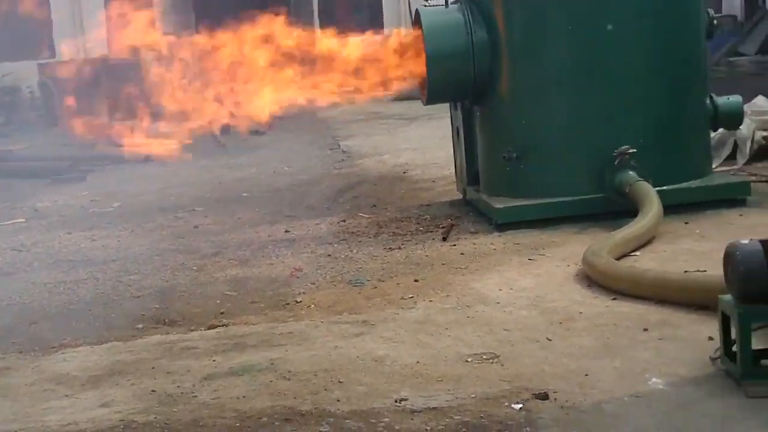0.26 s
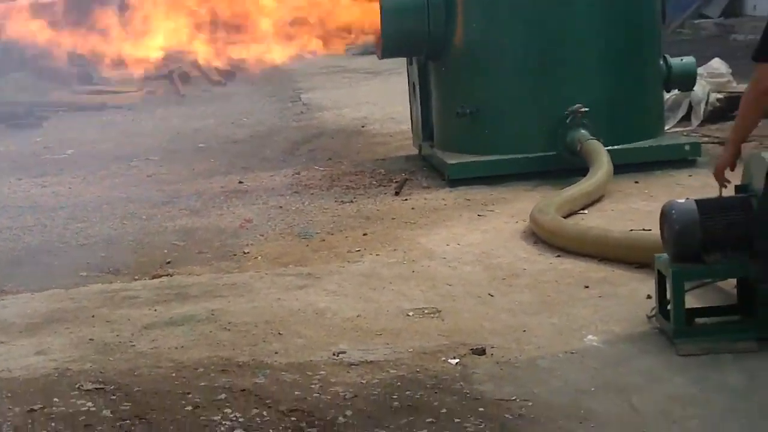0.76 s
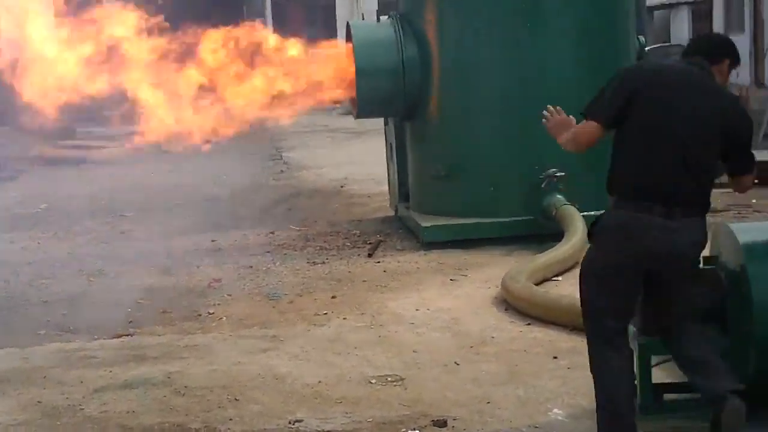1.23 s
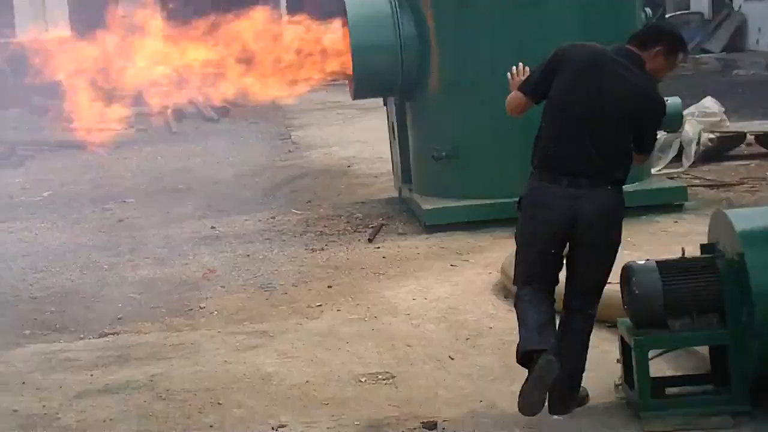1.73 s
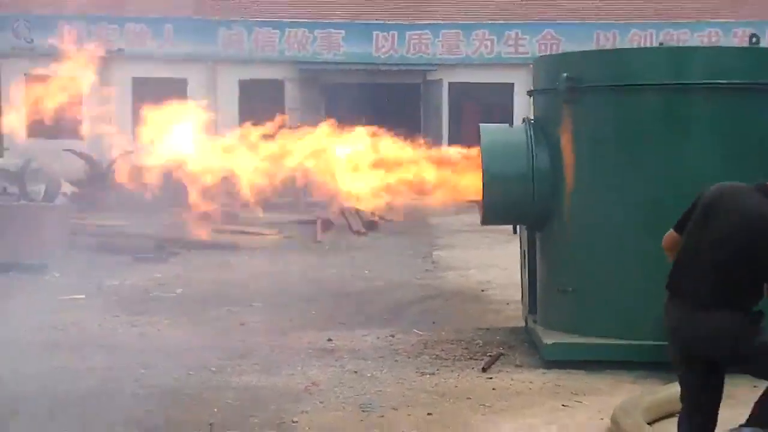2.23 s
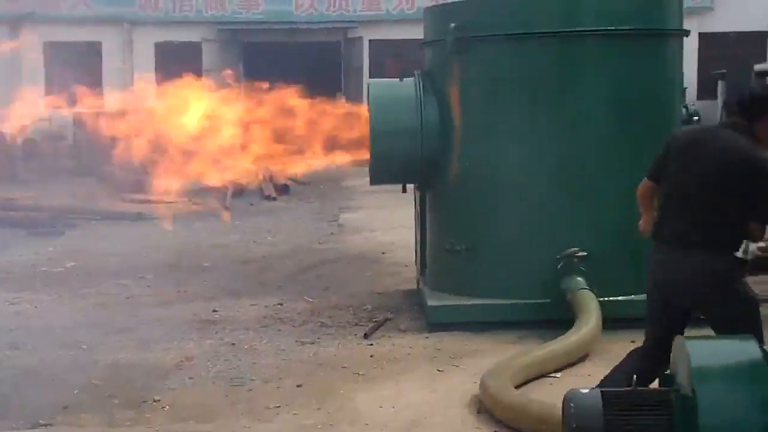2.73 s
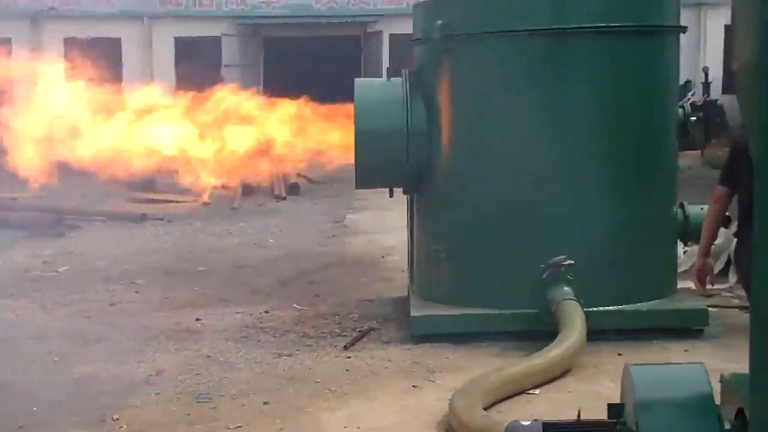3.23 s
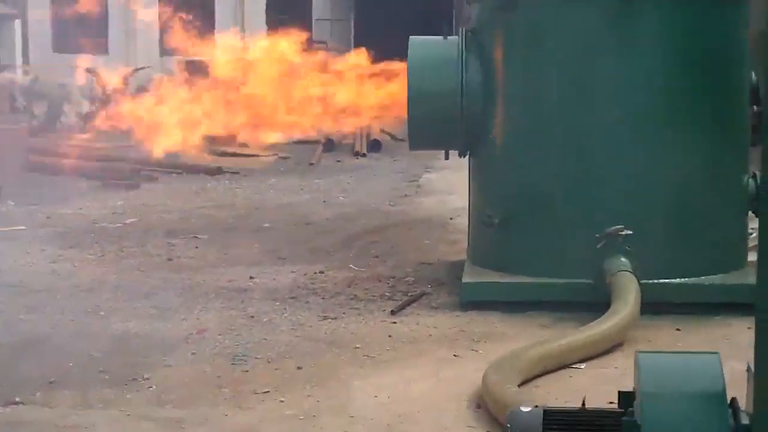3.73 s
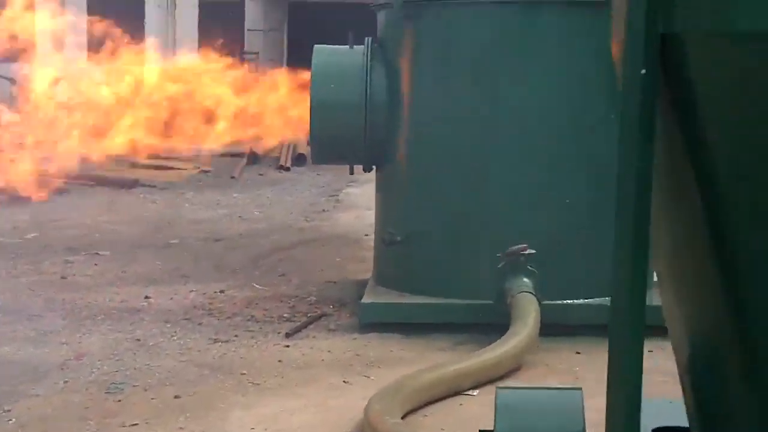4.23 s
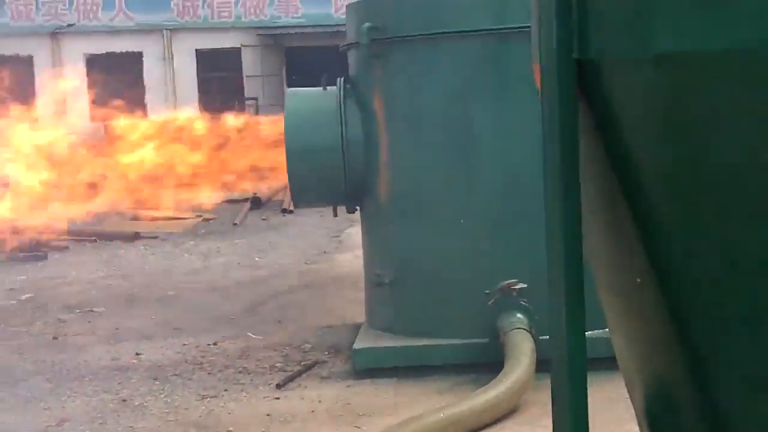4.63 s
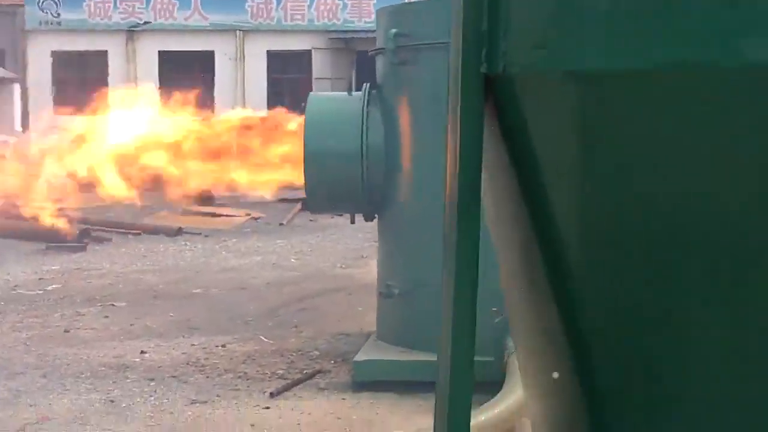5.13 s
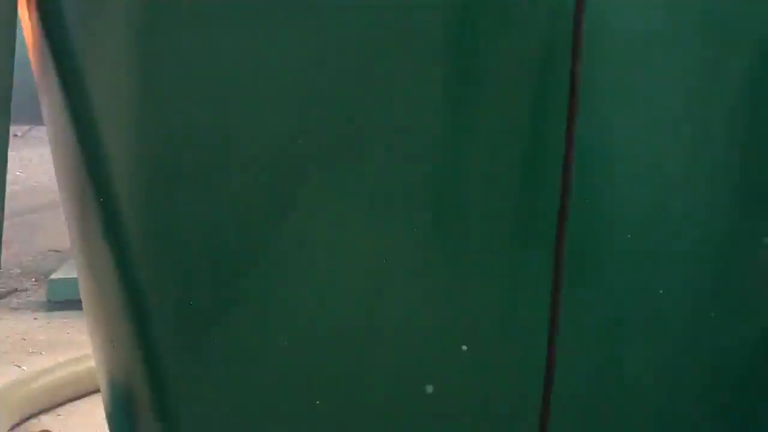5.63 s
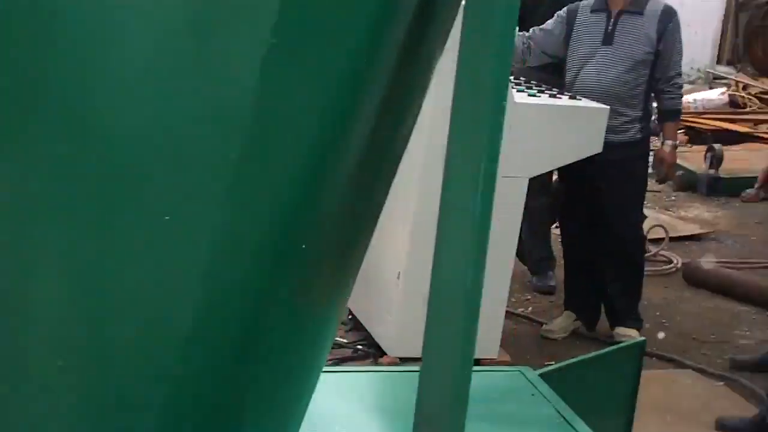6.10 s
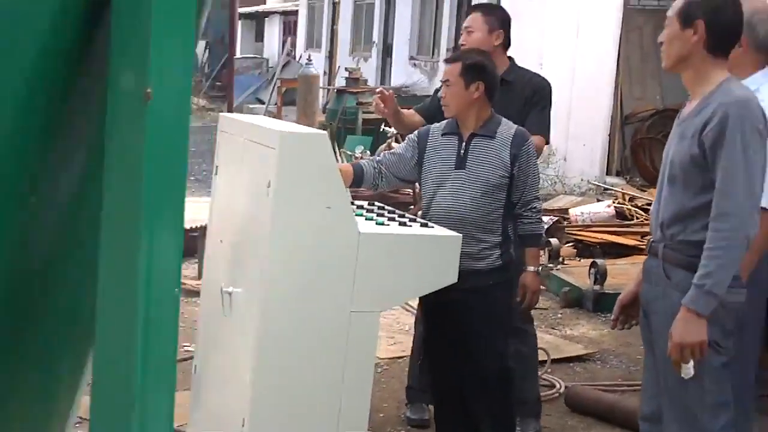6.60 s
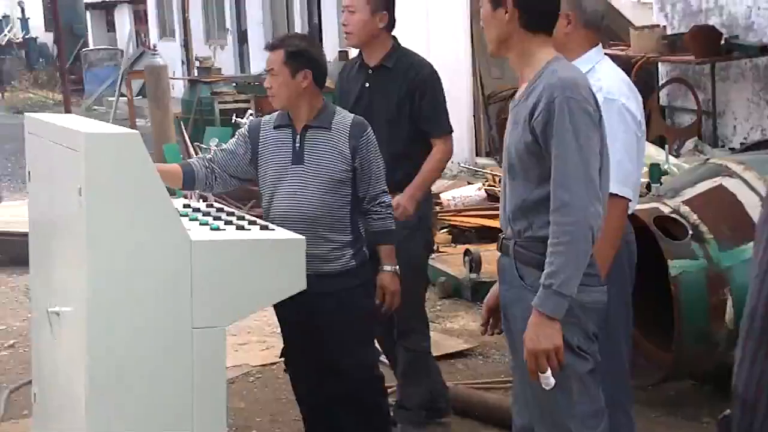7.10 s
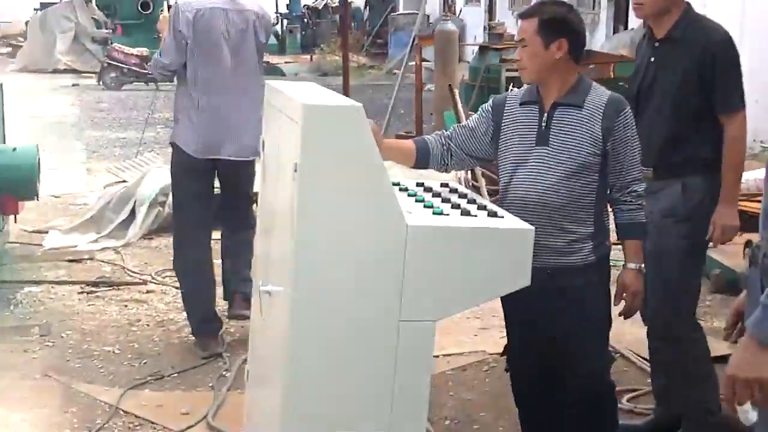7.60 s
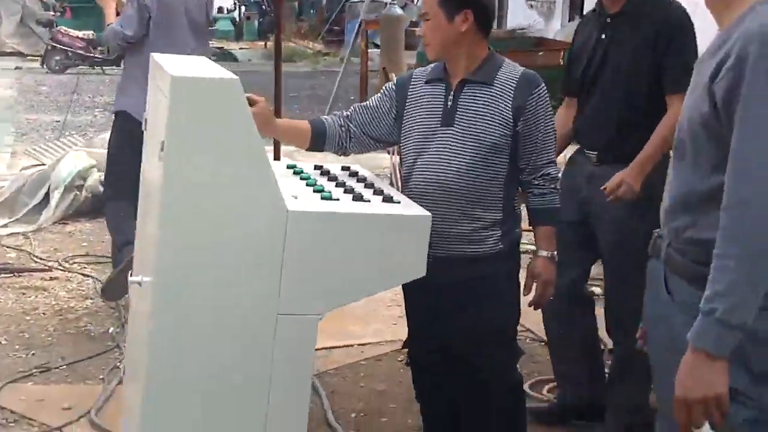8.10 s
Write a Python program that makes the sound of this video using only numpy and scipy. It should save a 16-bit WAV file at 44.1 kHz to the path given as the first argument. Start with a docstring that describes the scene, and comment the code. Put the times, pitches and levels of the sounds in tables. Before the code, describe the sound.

In an open factory yard, a big burner jet gives a continuous low, fluttering roar with faint air rush. Fuel lumps crack and clatter on steel plate, densest around two, three and a half, and six seconds. A blower tone flickers, then hums strongly as the mono microphone passes the hopper; the sound is dull on top, without deep treble sparkle.

```python
"""A large burner in a factory yard, in mono. The take opens on the flame's lumpy roar, under a faint hum
that creeps up in pitch and fades within the first second; fuel lumps soon clatter on the steel.
The microphone turns from the flame, passes behind the hopper and ends close to the blower, whose
blade tone flickers at first and is strongest from about 6 to 7.5 s. Air and fire are shaped noise,
blower and motor are unsteady sines, each lump is a burst of noise with ringing plate modes."""
import sys
import numpy as np
from scipy import signal
from scipy.fft import rfft, irfft
from scipy.io import wavfile
from scipy.ndimage import uniform_filter1d

SR = 44100
rng = np.random.default_rng(int(sys.argv[2]) if len(sys.argv) > 2 else 0)


def boost_factor(decibels):
    """Convert a level in decibels to a linear amplitude factor."""
    exponent = np.asarray(decibels, float) / 20
    return 10 ** exponent


def int16_out(signal):
    """Quantize to a 16-bit WAV file."""
    q = np.round(np.clip(np.atleast_2d(signal).T, -1, 1) * 32767)
    wavfile.write(sys.argv[1], SR, q.astype(np.int16))


N = 368235  # samples

# flame and air jet as the microphone turns: start_s, rumble_db, roar_db, nozzle_db, rush_db
FLAME_LEVELS = [(0, -18.5, -22.5, -36, -37), (.35, -21, -26.5, -35, -37.5), (.55, -22, -21, -34.5, -35),
                (.95, -20, -23, -34.5, -40.5), (1.3, -18, -21, -33, -39), (1.9, -19.5, -21, -33, -35.5),
                (2.3, -20.5, -21.5, -30, -37.5), (2.55, -18.5, -22, -34, -34.5),
                (2.75, -20.5, -17.5, -32, -39), (2.95, -20.5, -22, -30.5, -37.5),
                (3.3, -18.5, -20.5, -32.5, -36.5), (3.7, -19, -22, -31.5, -38),
                (4.1, -19, -20.5, -29.5, -41), (4.7, -20, -20.5, -31, -35.5),
                (5.15, -16.5, -24.5, -29.5, -35.5), (5.7, -20, -23.5, -32, -30),
                (6.4, -18, -22, -34.5, -31.5), (6.9, -19.5, -25, -38, -32.5),
                (7.55, -18, -24.5, -36.5, -36), (7.85, -18, -27, -35, -33), (8.35, -18.5, -20.5, -38, -33)]
# slow combustion rumble, spectrum: frequency_hz, density_db (per Hz, relative)
RUMBLE_SPECTRUM = [(12, -11.5), (20, -11), (32, 5), (55, 3), (80, -4.5), (110, -5), (200, -30.5),
                   (400, -87)]
# tearing roar, spectrum without its hump: frequency_hz, density_db (per Hz, relative)
ROAR_SPECTRUM = [(60, -38.5), (90, -3), (125, -4), (165, -2), (210, -6), (270, -9.5), (340, -21.5),
                 (600, -65.5)]
# hump in the roar that drifts as the flame stretches: start_s, centre_hz, height_db
ROAR_HUMP = [(0, 140.2, 3.5), (.5, 136.2, 9), (1.1, 127, 8), (1.6, 132, 7.5), (1.9, 162, 1.5),
             (2.2, 163, 7), (2.75, 169, 2.5), (3.4, 168.4, 5), (3.7, 149, 1.5), (4, 148, 4.5),
             (4.35, 120.8, 4), (4.8, 140, -2.5), (5.2, 160, 5), (5.7, 163, -0.5), (8.35, 166.4, 0.5)]
# nozzle noise, spectrum: frequency_hz, density_db (per Hz, relative)
NOZZLE_SPECTRUM = [(350, -23), (480, -8.5), (620, 4.5), (760, 3.5), (950, -1.5), (1100, -7), (1500, -10),
                   (2500, -47.5)]
# blower casing noise, spectrum: frequency_hz, density_db (per Hz, relative)
CASING_SPECTRUM = [(220, -24.5), (290, 3), (330, -0.5), (420, -2), (520, -5), (620, -10.5), (1000, -55)]
# air rush before its tilt, spectrum: frequency_hz, density_db (per Hz, relative)
RUSH_SPECTRUM = [(850, -8.5), (1450, -2.5), (1620, -2.5), (1980, -2.5), (2300, -6), (2520, -4),
                 (4370, -10.5), (4900, -11.5), (6730, -22.5), (7300, -49), (9490, -71), (16100, -120)]
# treble tilt of the rush as the microphone turns: start_s, tilt_db_per_octave (well above 2500 Hz)
RUSH_TILT = [(0, 0.5), (.9, -0.5), (1.3, 2), (2.2, -1.5), (3.2, 0.5), (3.8, 4), (4.4, 3), (5.2, -1),
             (5.7, -0.5), (6, -3.5), (6.6, -4.5), (7.4, -3.5), (8.35, -2)]
# how far the hopper hides the jet: start_s, hidden_share (0-1)
HOPPER_SCREEN = [(0, 0), (3, 0.05), (4.5, 0.16), (5.8, 1), (6.6, 1), (7.5, 1), (8.35, 0.5)]
# fuel lumps landing on steel: start_s, level_db (about the peak), low_band_hz, high_band_hz,
# ring_share (0-1)
FUEL_LUMPS = [(0.1365, -18, 1180, 2580, 0.05), (0.3124, -19.5, 1850, 2630, 0.34),
              (0.393, -23, 1840, 3240, 0.2), (0.4815, -18.5, 1190, 2590, 0.34),
              (0.6425, -23, 1210, 2600, 0.8), (0.7105, -19, 1740, 2600, 0.4), (1.099, -25.5, 1380, 2700, 0),
              (1.1788, -19, 1150, 3200, 0.08), (1.2531, -24.5, 1190, 2880, 0),
              (1.3627, -22, 845, 2360, 0.3), (1.4729, -25, 1700, 2900, 0.2), (1.5086, -17, 2640, 3280, 0.2),
              (1.5927, -16, 1750, 2660, 0.17), (1.668, -22, 912, 3800, 0.8), (1.769, -25, 835, 2900, 0.08),
              (1.838, -14.5, 1750, 3100, 0.1), (1.863, -20.5, 1850, 1900, 0.3),
              (1.945, -19.5, 2600, 3280, 0.2), (1.954, -23, 2600, 3280, 0.5),
              (1.9867, -11.5, 2600, 2600, 0.8), (1.9955, -9, 2600, 3280, 0.85),
              (1.996, -18.5, 1430, 1950, 0.4), (2.014, -24.5, 1400, 1950, 0), (2.055, -25, 1400, 2760, 0),
              (2.4577, -16.5, 1730, 2940, 0.06), (2.5315, -20.5, 1500, 2960, 0.37),
              (2.6238, -17, 900, 2820, 0), (2.6962, -17.5, 939, 2950, 0.27), (3.092, -11, 850, 4900, 0.2),
              (3.3163, -5, 2400, 3180, 0.2), (3.3353, -19, 1750, 2400, 0), (3.354, -17.5, 2400, 2760, 0.3),
              (3.4018, -17, 1850, 3020, 0.22), (3.4056, -5, 2420, 3600, 0.07),
              (3.4115, -10, 940, 4900, 0.3), (3.4225, -14, 940, 3100, 0.2), (3.442, -16, 1040, 3420, 0.6),
              (3.466, -22, 2760, 3420, 0.6), (3.529, -14, 1300, 3440, 0.25), (3.605, -15.5, 939, 3100, 0.4),
              (3.6341, -12, 2920, 3970, 0.4), (3.651, -22, 3000, 4900, 0.5), (3.775, -28, 1400, 3070, 0),
              (3.891, -21.5, 910, 3000, 0.07), (3.966, -22.5, 2300, 3050, 0), (4.03, -21, 851, 2760, 0),
              (4.151, -20, 1400, 4430, 0.6), (4.276, -30, 1400, 3500, 0.6), (4.5753, -18.5, 990, 3280, 0.4),
              (4.606, -23.5, 3280, 4600, 0.9), (4.676, -15, 2450, 2510, 0.7), (4.708, -19, 2300, 2450, 0.3),
              (4.7981, -22.5, 1380, 3520, 0), (4.858, -13.5, 2760, 3600, 0.2), (4.87, -17, 1650, 3280, 0.3),
              (4.888, -19, 1040, 3420, 0.8), (4.91, -24.5, 1650, 2580, 1), (5.066, -20.5, 1380, 3340, 0.6),
              (5.138, -12, 937, 3320, 0.15), (5.232, -12, 1850, 2760, 0.5), (5.243, -16, 1850, 2450, 0.4),
              (5.407, -24, 1400, 2530, 0.24), (5.5118, -8.5, 1040, 2620, 0.4),
              (5.518, -16.5, 1230, 1850, 0.4), (5.665, -8.5, 1040, 4600, 0.35),
              (5.674, -10.5, 1040, 1950, 0.8), (5.7, -18.5, 1750, 1750, 1), (5.7809, -15, 1240, 2050, 0.5),
              (5.814, -13, 1190, 1950, 0.4), (5.826, -21, 1950, 3280, 0.5), (5.997, -23, 1750, 1750, 0.6),
              (6.065, -22.5, 1750, 1750, 0.9), (6.114, -19.5, 2760, 3100, 0.3),
              (6.2627, -19.5, 1240, 2600, 0.4), (6.283, -23, 1210, 2600, 0.1),
              (6.3098, -23, 1850, 3800, 0.3), (6.33, -20, 1750, 2300, 0.4), (6.345, -15, 1260, 1850, 0.3),
              (6.369, -20.5, 1750, 3800, 0.4), (6.401, -14.5, 1046, 2760, 0.6),
              (6.413, -20.5, 1040, 3100, 0.2), (6.445, -23, 1750, 3410, 0.5),
              (6.491, -20.5, 1750, 3800, 0.3), (6.5476, -18, 2550, 4230, 0.6),
              (6.561, -24.5, 1850, 3420, 0.9), (6.772, -19.5, 851, 2500, 0.5),
              (6.864, -24.5, 1400, 3500, 0.8), (6.9178, -21, 1490, 2550, 0.1),
              (7.0702, -24.5, 1390, 3150, 0.07), (7.375, -25.5, 1750, 4600, 0.6),
              (7.522, -26, 2600, 4600, 0.2), (7.6616, -8.5, 900, 2580, 0.2),
              (7.671, -11.5, 1650, 1950, 0.25), (7.685, -16, 1950, 2600, 0.2),
              (7.7014, -19.5, 1850, 2580, 0.3), (7.721, -21.5, 1950, 2760, 0.1),
              (7.735, -22, 1950, 2300, 0.2), (7.746, -20.5, 1040, 2910, 0.3),
              (7.77, -26.5, 1990, 3100, 0.3), (7.788, -33, 2300, 3420, 0.2), (7.815, -23, 2300, 2870, 0),
              (7.875, -19, 2300, 4600, 0.4), (7.899, -23, 1650, 4600, 0.7), (8.1096, -19.5, 921, 2390, 0.1),
              (8.1284, -20.5, 847, 2200, 0.5), (8.141, -25, 1750, 1950, 0.75),
              (8.228, -24.5, 1650, 2760, 0.3), (8.283, -17.5, 1650, 2600, 0.3),
              (8.2909, -15.5, 1650, 3100, 0.3), (8.2981, -15.5, 1650, 3100, 0.25),
              (8.302, -13, 1040, 1650, 0.4), (8.315, -15, 1650, 2580, 0.3), (8.337, -18, 900, 2760, 0.3)]
# hopper plate modes without loose fuel: pitch_hz, level_db, t60_s
HOPPER_MODES = [(880, -12, 0.2), (912, 2, 0.28), (1040, 3.5, 0.081), (1157, -3, 0.13), (1215, -4, 0.47),
                (1260, -9, 0.6), (1400, -4.5, 0.16), (1736, -6, 0.88), (1750, -6.5, 0.73),
                (1850, 0.5, 0.23), (1650, -9, .12), (1950, -5.5, 0.13), (2300, -14, .12), (2450, -2, 0.1),
                (2510, -4, 0.06), (2600, -4.5, 0.082), (3100, -11, 0.16), (3280, -2.5, 0.087),
                (3600, -4, .08), (4900, -5.5, .08), (3420, -7.5, 0.1), (4230, -20, .1), (4390, -7, 0.16),
                (2760, -5, 0.036), (3800, -8, 0.064), (4600, -6, 0.066), (5100, -11.5, 0.059)]
# noisy crack of a lump, base spectrum: frequency_hz, density_db (per Hz, relative)
CRACK_SPECTRUM = [(500, -31.5), (850, -5), (1300, -5), (2130, -7.5), (2440, -6.5), (2740, -5), (4180, -7),
                  (4910, -5), (6920, -17), (7300, -36), (9490, -60.5), (16100, -120)]
# short dull blips: start_s, peak_db, pitch_hz (at the start, before the sag), length_s
DULL_KNOCKS = [(7.488, -23, 760, .032), (7.506, -30, 1170, 0.029)]
# blower blade tone, flickering at first, strongest and steadier from about 6 to 7.5 s: start_s, level_db
BLADE_LEVEL = [(0.0, -21), (0.02, -22), (1.12, -28.5), (1.16, -36), (1.21, -30.5), (1.28, -34), (1.32, -35),
               (1.67, -19), (2.04, -26), (2.23, -25.5), (2.35, -31.5), (2.6, -24), (2.79, -24), (2.93, -28),
               (3.35, -23), (3.63, -33), (3.65, -37.5), (4.02, -25), (4.3, -29), (4.4, -42), (4.58, -25.5),
               (4.79, -35.5), (4.93, -29.5), (4.95, -36.5), (5.18, -18.5), (5.35, -18.5), (5.65, -22),
               (6.12, -13.5), (7.46, -14), (7.84, -22.5), (8.3, -20.5), (8.35, -21)]
# octave of the blade tone, coming and going on its own: start_s, level_db
OCTAVE_LEVEL = [(0, -46.5), (.25, -39), (.4, -47), (.55, -36), (.9, -34.5), (1.05, -48), (1.3, -51),
                (1.43, -35), (1.58, -56), (1.75, -40), (1.92, -34.5), (2.1, -54), (3.7, -59), (3.85, -46),
                (4.1, -50), (4.4, -40), (4.6, -48), (4.9, -57), (5.08, -33), (5.3, -37), (5.42, -51),
                (5.68, -45), (5.85, -35.5), (6.0, -35.5), (6.2, -43), (6.4, -37), (6.6, -39), (6.9, -33.5),
                (7.35, -32), (7.6, -35.5), (7.72, -39), (7.79, -34), (7.86, -40), (8.1, -36), (8.35, -31)]
# motor whine: start_s, level_db
WHINE_LEVEL = [(0, -50), (.35, -45), (.58, -41.5), (.72, -50.5), (2.6, -46.5), (3.1, -54), (3.35, -40.5),
               (4.0, -47), (4.14, -35.5), (4.4, -41), (4.65, -41), (4.8, -35), (4.95, -31.5), (5.1, -36.5),
               (5.3, -35.5), (5.5, -39.5), (5.65, -32.5), (5.85, -39), (6.12, -50), (6.3, -38.5),
               (6.8, -43), (6.98, -46.5), (7.1, -35), (7.2, -39.5), (7.36, -42), (7.44, -60), (7.53, -42),
               (7.8, -47.5), (8.05, -43.5), (8.35, -53)]
# fainter whine just below it: start_s, level_db
UNDER_WHINE_LEVEL = [(0, -64.5), (3.6, -54), (4.1, -46), (5, -46.5), (5.4, -44), (5.8, -55), (7, -62),
                     (8.35, -55.5)]
# faint early hum: start_s, pitch_hz, level_db
FAINT_HUM = [(0, 380, -42), (.12, 380, -37), (.33, 381, -39), (.55, 386, -37), (.74, 391, -39),
             (.84, 393, -57)]

HUMP_OCTAVES = 0.17  # distance from the hump's centre to 1/e of its dB height
LUMPY_DB, LUMPS_HZ = 1.3, 9  # random flutter of the roar: rms depth, fastest rate
GUST_DB, GUST_HZ = 1.2, 25  # random gusts in the rush: rms depth, fastest rate
CASING_DB, CASING_NEAR_DB = -35.5, 5.5  # the rise comes as the jet is hidden and the blower nears
RISE_AT_0_DB_S, SLOWER_PER_DB = .0008, .75  # weak lumps tumble and start more softly
LUMP_T60_S, CHIP_T60_S = 0.25, 0.21
DAMP_T60_S = 0.24  # loose fuel on the plate shortens its ringing
CHIPS_DB, CHIPS_PER_S = -46.5, 40  # small chips that rattle all the time
BLADE_HZ, WHINE_HZ, UNDER_HZ = 296.75, 1387, 1267


def evened(x):
    """Scales to rms 1."""
    return x / np.sqrt(np.mean(x ** 2) + 1e-20)


def read(points, hz):
    """Reads a spectrum on a log-frequency axis."""
    f, value = np.transpose(points)
    return np.interp(np.log(hz + 1), np.log(f + 1), value)


def curve(rows, t):
    """Columns of a table at the times t."""
    s, *columns = np.transpose(rows)
    return [np.interp(t, s, c) for c in columns]


def wander(t, top_hz):
    """Slow random drift of rms 1, a sum of sines up to top_hz."""
    rates = np.geomspace(top_hz / 20, top_hz, num=24)
    return evened(sum(np.sin(2 * np.pi * (f * t + rng.random())) / np.sqrt(f) for f in rates))


def smoothed(x, width):
    """Two passes of a running mean over width samples."""
    return uniform_filter1d(uniform_filter1d(x, size=width), size=width)


def coloured(x, db_of_hz):
    """Weights the spectrum of noise by a dB curve."""
    hz = np.fft.rfftfreq(len(x), 1 / SR)
    return irfft(rfft(x) * boost_factor(db_of_hz(hz)), len(x))


def oscillator(hz):
    """Sine that follows a moving pitch."""
    return np.sin(2 * np.pi * np.cumsum(hz) / SR)


def turbulence(field_db, size, patchy_db):
    """Random short-time spectra under a dB field (bins x frames) with drifting patches."""
    real, imag, patches = rng.standard_normal((3,) + field_db.shape)
    patches = uniform_filter1d(patches, size=8, axis=0)
    patches = evened(uniform_filter1d(patches, size=6, axis=1))
    spectra = (real + 1j * imag) * boost_factor(field_db + patchy_db * patches)
    return signal.istft(spectra, nperseg=size, noverlap=size - size // 4)[1][:N]


def flame():
    """Slow combustion rumble, tearing roar, humps of nozzle and casing, the rush of air on top."""
    # long frames for the low layers
    hz = np.fft.rfftfreq(2048, 1 / SR)[:, None]
    steady = np.zeros(N // 512 + 5)
    hump_hz, hump_db = curve(ROAR_HUMP, np.arange(len(steady)) * 512 / SR)
    hump_db = hump_db * np.exp(-(np.log2((hz + 1) / hump_hz) / HUMP_OCTAVES) ** 2)
    rumble = turbulence(read(RUMBLE_SPECTRUM, hz) + steady, size=2048, patchy_db=0.0)
    roar = turbulence(read(ROAR_SPECTRUM, hz) + hump_db, size=2048, patchy_db=1.0)
    nozzle = turbulence(read(NOZZLE_SPECTRUM, hz) + steady, size=2048, patchy_db=0.77)
    casing = turbulence(read(CASING_SPECTRUM, hz) + steady, size=2048, patchy_db=0.7)

    # short frames for the quick rush
    t = np.arange(N // 128 + 5) * 128 / SR
    hz = np.fft.rfftfreq(512, 1 / SR)[:, None]
    tilt_db = np.log2(1 + hz / 2500) * curve(RUSH_TILT, t)[0]
    gusts_db = GUST_DB * wander(t, GUST_HZ)
    rush = turbulence(read(RUSH_SPECTRUM, hz) + tilt_db + gusts_db, size=512, patchy_db=2.0)

    now = np.arange(N) / SR
    rumble_db, roar_db, nozzle_db, rush_db = curve(FLAME_LEVELS, now)
    roar_db = roar_db + LUMPY_DB * np.interp(now, t, wander(t, LUMPS_HZ))
    casing_db = CASING_DB + CASING_NEAR_DB * curve(HOPPER_SCREEN, now)[0]
    layers = rumble, roar, nozzle, rush, casing
    levels_db = rumble_db, roar_db, nozzle_db, rush_db, casing_db
    return sum(evened(layer) * boost_factor(db) for layer, db in zip(layers, levels_db))


def fuel():
    """Lumps of fuel and dull knocks at their moments; small chips landing at random."""
    out = np.zeros(N + 16384)
    for s, db, low_hz, high_hz, ring in FUEL_LUMPS:
        # weak lumps start more softly than strong or ringing ones
        rise_s = RISE_AT_0_DB_S * boost_factor(-SLOWER_PER_DB * db * (2 - ring))
        out[round(s * SR):][:16384] += boost_factor(db) * clatter(low_hz, high_hz, LUMP_T60_S, ring, rise_s)
    for s, db, hz, length in DULL_KNOCKS:
        blip = boost_factor(db) * knock(hz, length)
        out[round(s * SR):][:len(blip)] += blip
    return out[:N] + boost_factor(CHIPS_DB) * evened(chips())


def clatter(low_hz, high_hz, t60, ring, rise_s):
    """A lump snaps and skids: a noisy crack, plus the plate modes near two bands where it lands."""
    t = np.arange(16384) / SR
    onset = 1 - np.exp(-t / rise_s)
    # a sharp snap, the skid, then the duct and the yard carry a slower tail
    snap = boost_factor(-1.0 - 60 * (t / 0.027) ** 2)
    tail = boost_factor(-60 * t / t60) + boost_factor(-9.5 - 60 * t / 0.46)
    noise, skid, grit, hop, body = rng.standard_normal((5, len(t)))
    crack = crack_noise(noise, body, low_hz, high_hz)
    dull = coloured(crack, lambda f: -7 * np.log2(1 + f / 2000))  # the tail is duller
    unevenness = boost_factor(2.5 * evened(smoothed(grit, 90)))  # of the skid, 2.5 dB rms
    crack = (crack * snap + dull * tail) * onset * unevenness

    # crumbs that hop on after the landing
    crumbs_per_s = 250
    landing = rng.random(len(t)) < crumbs_per_s / SR
    hops = landing * hop * boost_factor(-3 - 60 * t / .5) * np.sqrt(SR / crumbs_per_s)
    blow = onset * (skid * (snap + tail) ** 8 + .3 * hops)
    rings = plate_ring(blow[:8192], low_hz, high_hz)
    rings = np.pad(rings, (0, len(t)))[:len(t)]
    crack, rings = (part / abs(part).max() for part in (crack, rings))
    return np.sqrt(1 - ring) * crack + np.sqrt(ring) * rings


def crack_noise(noise, body, low_hz, high_hz):
    """Broad noise swelling at both bands, with uneven resonances of the lump's own."""
    body_db = 1.5 * evened(smoothed(body, 40))[:len(noise) // 2 + 1]

    def spectrum_db(f):
        bumps = [np.exp(-(np.log2((f + 1) / band) / 0.045) ** 2) for band in (low_hz, high_hz)]
        slope_db = -1.2 * np.log2((f + 1) / high_hz) ** 2
        return read(CRACK_SPECTRUM, f) + body_db + slope_db + 5 * sum(bumps)

    return evened(coloured(noise, spectrum_db))


def plate_ring(blow, low_hz, high_hz):
    """Decaying plate modes excited by a rough blow, strongest near the two bands."""
    t = np.arange(8192) / SR
    hz, db, t60 = np.transpose(HOPPER_MODES)[..., None]
    strength, detune = rng.standard_normal((2, len(HOPPER_MODES), 1))
    # the modes under the point of landing ring most, the rest of the plate faintly
    near = sum(boost_factor(-250 * np.log2(hz / band) ** 2) for band in (low_hz, high_hz)) + boost_factor(-16)
    decay_db = -60 * t * (1 / t60 + 1 / DAMP_T60_S)
    modes = near * boost_factor(db + 1.5 * strength + decay_db)
    modes = modes * np.sin(2 * np.pi * hz * (1 + 0.0028 * detune) * t)
    return signal.fftconvolve(np.sum(modes, axis=0), blow)


def knock(hz, length):
    """A soft, short tone whose pitch sags by 6 percent."""
    u = np.arange(0, length, 1 / SR) / length
    return np.sin(np.pi * u ** .7) ** 2 * oscillator(hz * (1 - .06 * u))


def chips():
    """Small chips of twelve kinds landing at random, a few of them much larger."""
    size = boost_factor(4 * np.minimum(rng.exponential(1, N), 3.5))
    size = size * (rng.random(N) < CHIPS_PER_S / SR)
    kind = rng.integers(0, 12, N)
    out = np.zeros(N)
    for k, hz in enumerate(np.geomspace(1800, 4000, num=12)):
        chip = clatter(hz / 2, hz, CHIP_T60_S, ring=.2, rise_s=0.005)
        out += signal.oaconvolve(size * (kind == k), chip)[:N]
    return out


def blower():
    """Blade tone and octave on one slightly unsteady shaft, and thin whines from the motor."""
    t = np.arange(N) / SR
    slow = np.arange(0, N / SR + 0.0035, .005)
    shaft, flutter, drift, shimmer = (np.interp(t, slow, wander(slow, hz)) for hz in (3, 27, 5, 24))
    turns = 2 * np.pi * np.cumsum(BLADE_HZ * (1 + 0.0012 * shaft)) / SR
    blade = boost_factor(curve(BLADE_LEVEL, t)[0] + 0.55 * flutter) * np.sin(turns)
    octave = boost_factor(curve(OCTAVE_LEVEL, t)[0] + 0.53 * shimmer) * np.sin(2 * turns)
    # the wanders read backwards serve as further level flutters
    whine = boost_factor(curve(WHINE_LEVEL, t)[0] + 1.0 * shimmer[::-1])
    whine = whine * oscillator(WHINE_HZ * (1 + .0009 * (drift + flutter)))
    under = boost_factor(curve(UNDER_WHINE_LEVEL, t)[0] + 2.1 * flutter[::-1])
    under = under * oscillator(UNDER_HZ * (1 + 0.0023 * shimmer))
    return np.sqrt(2) * (blade + octave + under + whine)  # root 2: the levels are rms


def drone():
    """A faint wavering hum that creeps upward and fades within the first second."""
    t = np.arange(SR) / SR
    hz, db = curve(FAINT_HUM, t)
    hum = boost_factor(db + .8 * wander(t, 25)) * oscillator(hz + 0.77 * wander(t, 9.7))
    return np.pad(np.sqrt(2) * hum, (0, N - SR))


def scene():
    """All sources at one microphone."""
    return (flame() + fuel() + blower() + drone())[None]


def low_pass(x):
    """Removes everything above the highest recorded frequency."""
    return signal.sosfilt(signal.butter(12, 7450, fs=SR, output="sos"), x)


def record(dry):
    """The microphone signal in a narrow band: a steep low-pass at 7240 Hz."""
    band = signal.firwin(401, 7240, window=("kaiser", 9), fs=SR)
    mix = signal.oaconvolve(dry, band[None], "same")
    return low_pass(mix)


dry = scene()
out = record(dry)
int16_out(out)
```